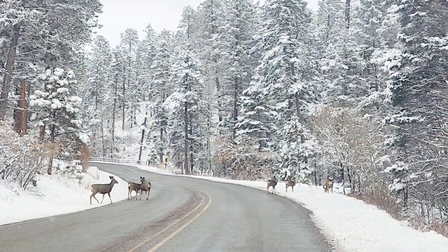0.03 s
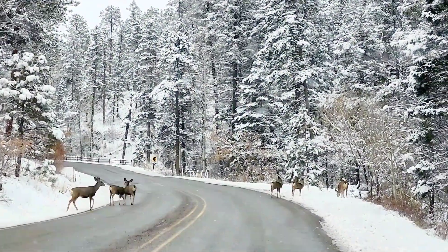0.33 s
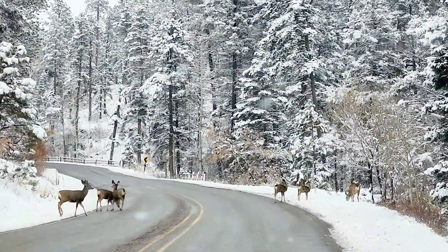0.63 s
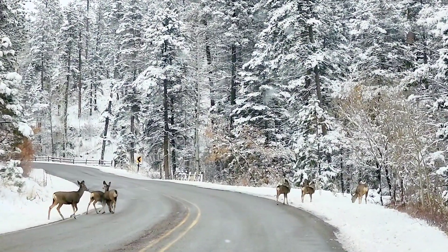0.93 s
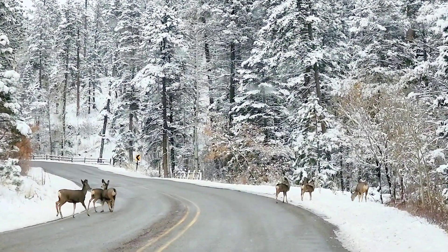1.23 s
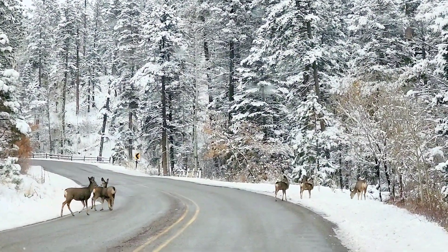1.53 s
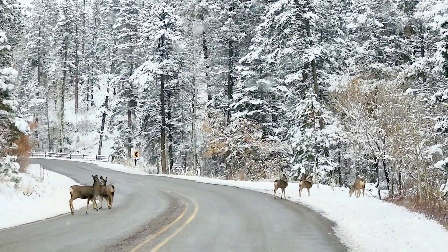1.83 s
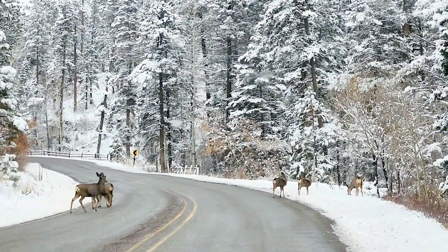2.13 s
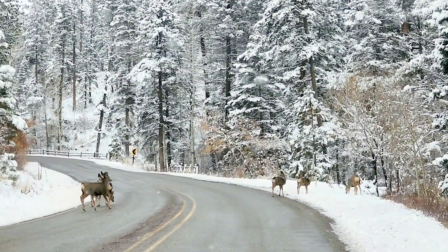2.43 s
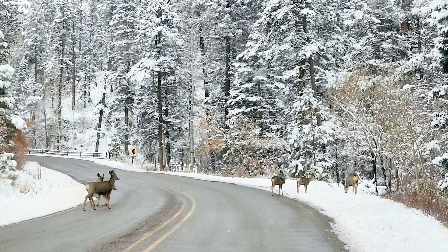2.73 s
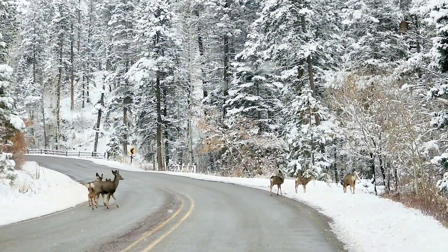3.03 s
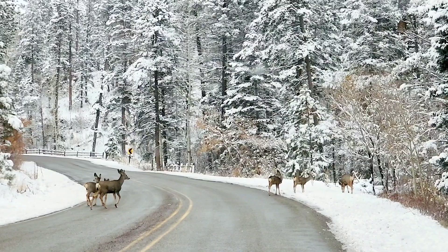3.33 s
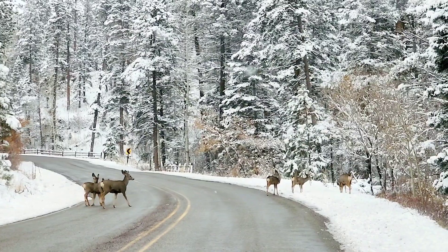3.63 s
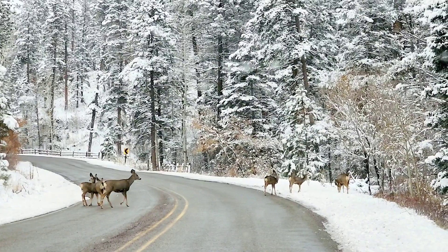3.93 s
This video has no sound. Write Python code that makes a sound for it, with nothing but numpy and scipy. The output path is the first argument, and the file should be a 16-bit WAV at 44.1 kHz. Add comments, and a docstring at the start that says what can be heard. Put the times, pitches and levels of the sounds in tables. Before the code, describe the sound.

Hazard lights click steadily inside a stopped car, a bright tick alternating with a duller tock over the idling engine's low rumble. The trim gives two tiny clicks, and something rubs faintly at the end.

```python
"""A hazard relay goes tick, tock inside a stopped car, over the low rumble of the idling engine.
The armature closes with a bright tick and drops back with a duller tock; the contacts bounce,
both strokes ring the same small housing, and the padded cabin adds a short, faint tail.
Two stray little clicks come from the trim, and at the end something rubs softly over it."""
import sys
import numpy as np
from scipy import signal
from scipy.fft import rfft, irfft
from scipy.io import wavfile
from scipy.ndimage import uniform_filter1d

SR = 44100
rng = np.random.default_rng(int(sys.argv[2]) if len(sys.argv) > 2 else 0)


def unload_audio(sound):
    """Save the sound as a 16-bit wav file, at the path given as the first command line argument."""
    columns = np.transpose(np.atleast_2d(sound))
    # keep every value between -1 and 1, then stretch to whole-number steps
    steps = np.round(np.clip(columns, -1, 1) * 32767)
    wavfile.write(sys.argv[1], SR, steps.astype(np.int16))


N = 176400  # 4 s


def amp(db):
    """Decibels to gain."""
    return 10 ** (np.asarray(db) / 20)


def unit_rms(x):
    """Scales to rms 1."""
    return x / np.sqrt(np.mean(x ** 2) + 1e-20)


def unit_blow(x, nominal_s=.02):
    """Scales a blow to the energy of rms 1 held for nominal_s."""
    return x / np.sqrt((x ** 2).mean(0).sum() / (nominal_s * SR))


def at_hz(table, hz):
    """Interpolates a table on a log-frequency axis."""
    table_hz, value = np.transpose(table)
    return np.interp(np.log(hz + 1), np.log(table_hz + 1), value)


def envelope(table, t):
    """Gain over time, interpolated in dB."""
    return amp(np.interp(t, *np.transpose(table)))


def pan(db):
    """Stereo gains for a left-minus-right level."""
    return amp(np.array([db, -db]) / 2)


def add(mix, start_s, sound):
    """Mixes a stereo sound in at start_s."""
    part = mix[:, max(round(start_s * SR), 0):][:, :sound.shape[1]]
    part += sound[:, :part.shape[1]]


def coloured(x, colour_db, pan_db=0, size=4096):
    """Minimum-phase filter with the given spectrum and balance."""
    hz = np.fft.rfftfreq(size, 1 / SR)
    log_gain = np.log(amp(at_hz(colour_db, hz)) * pan(pan_db + 0 * hz))
    mirrored = np.concatenate([log_gain, log_gain[:, -2:0:-1]], axis=1)
    taps = np.fft.ifft(np.exp(np.conj(signal.hilbert(mirrored)))).real
    return signal.fftconvolve(x, taps[:, :size // 2], axes=1)[:, :x.shape[1]]


def dense_ring(t60_s, rise_s, count=8192):
    """Dense ring of a struck part: stereo noise with a decay time per band and a flattened spectrum."""
    hz, frame_s, bands = signal.stft(rng.standard_normal((2, count)), SR, nperseg=128)
    decay = amp(-60 * frame_s / at_hz(t60_s, hz)[:, None])
    ring = signal.istft(bands * decay, SR, nperseg=128)[1][:, :count]
    attack = np.minimum(np.arange(count) / SR / rise_s, 1)
    spectrum = rfft(ring * attack, 2 * count)
    power = uniform_filter1d(abs(spectrum) ** 2, size=150, axis=1)
    return irfft(spectrum / np.sqrt(power + 1e-12))[:, :count]


# rumble and air spectrum (frequency [Hz], relative density [dB])
IDLE_COLOUR_DB = [(12, -33), (24, -15), (34, -2.5), (46, -2.5), (62, -13.5), (76, -9.5), (92, -11.5),
                  (115, -11), (138, -19.5), (165, -18), (212, -24), (285, -24), (325, -27.5), (362, -34),
                  (440, -32.5), (520, -43), (595, -37.5), (720, -48.5), (810, -42.5), (880, -47.5),
                  (1020, -43), (1120, -49), (1255, -40), (1305, -47.5), (1355, -37), (1430, -47.5),
                  (1700, -57.5), (2600, -68.5), (4500, -79), (7500, -83), (10500, -87), (13000, -83.5),
                  (16000, -85)]
# stereo likeness (frequency [Hz], left-right correlation [-])
IDLE_CORRELATION = [(35, .985), (70, .985), (110, .96), (200, .93), (320, .65), (450, .55), (650, .1),
                    (1300, -.15), (3100, .18), (15000, .24)]
# balance (frequency [Hz], left minus right [dB])
IDLE_PAN_DB = [(35, 1.5), (90, 0.2), (180, -1.5), (350, -1), (1300, 1), (4000, 0)]
# bass swell (time [s], level [dB])
IDLE_SWELL_DB = [(0, -43), (.08, -30), (.17, -41.5), (.45, -37), (.69, -28), (.8, -37.5), (1.13, -31.5),
                 (1.35, -34), (1.75, -35.5), (2.08, -39), (2.24, -32.5), (2.46, -33.5), (2.55, -28.5),
                 (2.72, -36.5), (2.9, -32.5), (3.55, -41), (3.7, -37.5), (4, -40.5)]


def idle_rumble(swell_below_hz=115, air_db=-33.5):
    """The body shell rumbles, nearly mono and swelling slowly, under a steady, diffuse rush of air."""
    hz, t = np.fft.rfftfreq(N, 1 / SR), np.arange(N) / SR
    noise = rfft(rng.standard_normal((2, N)))
    mid, side = (z / np.sqrt(uniform_filter1d(abs(z) ** 2, size=40)) for z in noise)
    correlation = np.clip(at_hz(IDLE_CORRELATION, hz), -1, 1)
    mid, side = mid * np.sqrt(1 + correlation), side * np.sqrt(1 - correlation)
    spectrum = np.array([mid + side, mid - side])
    spectrum *= amp(at_hz(IDLE_COLOUR_DB, hz)) * pan(at_hz(IDLE_PAN_DB, hz))
    spectrum /= irfft(spectrum, N).std()
    bass_share = 1 / (1 + (hz / swell_below_hz) ** 2)
    bass = irfft(spectrum * bass_share, N)
    air = irfft(spectrum * (1 - bass_share), N)
    return bass * envelope(IDLE_SWELL_DB, t) + amp(air_db) * air


def drift(t):
    """Slow random wander, rms 1: sines from 0.5 to 8 Hz."""
    rates_hz = np.geomspace(.5, 8, num=20)
    return unit_rms(sum(np.sin(2 * np.pi * (hz * t + rng.random())) for hz in rates_hz))


def firing_boom(firing_hz=34.9, wander_hz=2.73, swing_db=3.5, re_rumble_db=-4.5):
    """The engine's firing note, unsteady in pitch and strength, swelling with the rumble."""
    t = np.arange(N) / SR
    pitch_hz = firing_hz + wander_hz * drift(t)
    strength = amp(swing_db * np.tanh(drift(t)))
    note = np.sin(2 * np.pi * np.cumsum(pitch_hz) / SR) * strength
    level = amp(re_rumble_db) * envelope(IDLE_SWELL_DB, t)
    return pan(at_hz(IDLE_PAN_DB, firing_hz))[:, None] * unit_rms(note) * level


# tail decay (frequency [Hz], t60 [s])
CABIN_T60_S = [(500, .3), (2500, .32), (7000, .34), (15000, .38)]
# tail spectrum (frequency [Hz], relative density [dB])
CABIN_COLOUR_DB = [(400, 3), (2300, 6), (3200, 2), (4200, -3), (6000, 0), (9200, -1), (10800, -8),
                   (12500, -3), (16000, -5)]


def cabin_tail(strokes, level_db=-65):
    """The padded cabin leaves a faint diffuse tail after each relay stroke."""
    out = np.zeros((2, N))
    for time_s, *_ in strokes:
        tail = dense_ring(CABIN_T60_S, rise_s=.006, count=17640)
        add(out, time_s, unit_blow(coloured(tail, CABIN_COLOUR_DB)))
    return amp(level_db) * out


# rub envelope (time [s], level [dB])
RUB_LEVEL_DB = [(3.735, -85), (3.77, -75), (3.81, -70), (3.86, -68), (3.91, -72.5), (3.96, -68), (4, -83)]
# friction spectrum (frequency [Hz], relative density [dB])
RUB_COLOUR_DB = [(1000, -6), (2100, 5.5), (3150, -2.5), (3900, -8), (4700, -7), (5400, -7), (7300, -9),
                 (9300, -9), (10800, -17), (12500, -13), (14500, -12), (16000, -14)]
# rubbed resonances (frequency [Hz], width [Hz], level re hiss [dB])
RUB_RESONANCES = [(2800, 60, -14), (3170, 40, -16), (4220, 35, -16), (5402, 70, -12), (6130, 120, -15),
                  (7140, 110, -17)]


def trim_rub(grain_db=.5, pan_db=4):
    """Something slides softly over the trim: uneven friction hisses and wakes faint resonances."""
    t, hz = np.arange(N) / SR, np.fft.rfftfreq(N, 1 / SR)
    grain = amp(grain_db * unit_rms(uniform_filter1d(rng.standard_normal(N), size=200)))
    friction = rng.standard_normal((2, N)) * grain
    ring = sum(amp(db) * unit_rms(irfft(rfft(friction) / (1 + 2j * (hz - mode_hz) / width_hz), N))
               for mode_hz, width_hz, db in RUB_RESONANCES)
    hiss = unit_rms(coloured(friction, RUB_COLOUR_DB))
    level = envelope(RUB_LEVEL_DB, t) * (t > RUB_LEVEL_DB[0][0])
    return pan(pan_db)[:, None] * unit_rms(hiss + ring) * level


# snap ring decay (frequency [Hz], t60 [s])
SNAP_T60_S = [(1000, .05), (3000, .03), (3900, .05), (4300, .17), (4800, .17), (5600, .04), (7500, .035),
              (14000, .05)]
# snap spectrum (frequency [Hz], relative density [dB])
SNAP_COLOUR_DB = [(300, 3), (1200, 3), (1700, -5), (2500, -3), (3100, -8), (4200, -4.5), (5600, -.5),
                  (8200, -12), (10000, -10), (13000, -2), (16000, -6)]
# knock spectrum (frequency [Hz], relative density [dB])
KNOCK_COLOUR_DB = [(500, -24), (1400, 4), (1650, -6), (1950, 9), (2400, -18), (5000, -40), (16000, -45)]


def trim_clicks(snap_s=.1544, snap_db=-49, crack_decay_s=.0008, ring_db=-14, knock_s=2.655, knock_db=-62):
    """The trim gives a tiny dry snap with a faint ring, and later a soft knock."""
    out = np.zeros((2, N))
    crack = dense_ring([(1000, .004)], rise_s=.0001)
    crack *= np.exp(-np.arange(crack.shape[1]) / SR / crack_decay_s)
    ring = dense_ring(SNAP_T60_S, rise_s=.0026)
    snap = coloured(unit_rms(crack) + amp(ring_db) * unit_rms(ring), SNAP_COLOUR_DB, pan_db=-2.5)
    add(out, snap_s, amp(snap_db) * unit_blow(snap))
    knock = coloured(dense_ring([(1000, .083)], rise_s=.0017), KNOCK_COLOUR_DB, pan_db=-1)
    add(out, knock_s, amp(knock_db) * unit_blow(knock))
    return out


def contact_bounce(t, delay_s=.0017, scatter_s=.0003, decay_s=.0009):
    """The contacts land again just after first touch, with a short crack."""
    since_s = t - delay_s - scatter_s * rng.standard_normal()
    return rng.standard_normal((2, len(t))) * (since_s > 0) * np.exp(-abs(since_s) / decay_s)


# housing modes (frequency [Hz], tick level [dB], tock level [dB], t60 [s])
HOUSING_MODES = [(1265, -15, -7, .1), (1352, -16, -7, .11), (1840, -25, -10, .06), (2085, -11, -14, .16),
                 (2135, -16, -21, .12), (2335, -3, -2, .062), (2420, -12, -3, .06), (2810, -10, -11, .06),
                 (2950, -19, -6, .06), (3020, -13, -8, .07), (3620, -18, -18, .05), (4350, -19, -25, .04),
                 (4730, -27, -20, .06), (5550, -6, -11, .036), (6020, -13, -3, .04), (6130, -12, -1, .045),
                 (6450, -7, -10, .036), (6720, -11, -4, .038), (7230, 0, -3, .04), (7390, 0, -15, .04),
                 (7530, -2, -13, .038), (7760, -6, -17, .036), (8120, -4, -13, .038), (8310, -2, -11, .04),
                 (8550, -7, -14, .038), (9330, -4, -14, .034), (11450, 0, -20, .03)]
# relay balance (frequency [Hz], left minus right [dB])
RELAY_PAN_DB = [(1300, 4), (2500, -5.5), (3300, 7.5), (5500, -2.5), (6500, -3.5), (8400, -1), (11500, -1.5),
                (15000, 4)]


def housing_ring(t, closing, rise_s, phases, scatter_db=2.5):
    """The relay housing's modes, each struck a little harder or softer on every stroke."""
    ring = np.zeros((2, len(t)))
    for (hz, tick_db, tock_db, t60_s), phase in zip(HOUSING_MODES, phases):
        level_db = (tick_db if closing else tock_db) + scatter_db * rng.standard_normal()
        mode = amp(level_db - 60 * t / t60_s) * np.sin(2 * np.pi * (hz * t + phase))
        ring += pan(at_hz(RELAY_PAN_DB, hz))[:, None] * mode
    return ring * np.minimum(t / rise_s, 1)


# dashboard ring decay (frequency [Hz], t60 [s])
DASH_T60_S = [(500, .1), (1400, .085), (2200, .056), (3000, .066), (4500, .054), (7000, .05), (14000, .049)]


def armature(strokes, colour_db, closing, housing_db, bounce_db, rise_s, lead_s,
             dash_db=-.5, variation=.4):
    """Near-identical blows ring dashboard and housing, each building up as the contacts settle."""
    out = np.zeros((2, N))
    shared_ring = dense_ring(DASH_T60_S, rise_s)
    t = np.arange(shared_ring.shape[1]) / SR
    pan_db = at_hz(RELAY_PAN_DB, np.fft.rfftfreq(4096, 1 / SR))
    phases = rng.random((len(HOUSING_MODES), 1, 1))
    phases = phases + rng.random((len(HOUSING_MODES), 2, 1)) / 2  # up to half a cycle per channel
    for time_s, level_db, treble_db in strokes:
        strike = unit_rms(shared_ring + variation * dense_ring(DASH_T60_S, rise_s))
        strike += amp(bounce_db) * unit_rms(contact_bounce(t))
        dash = amp(dash_db) * unit_blow(coloured(strike, colour_db, pan_db))
        housing = amp(housing_db) * housing_ring(t, closing, rise_s, phases)
        blow = coloured(dash + housing, [(4000, 0), (12000, treble_db)])  # treble shelf
        add(out, time_s - lead_s, amp(level_db) * blow)  # first touch comes early
    return out


# relay closes (time [s], relative level [dB], treble shelf [dB])
TICK_STROKES = [(0.3077, -45, 2.5), (0.992, -43.5, 1), (1.6757, -44, .5), (2.3603, -45, -0.5),
                (3.0442, -43.5, -2.5), (3.7294, -45, -1)]
# relay opens (time [s], relative level [dB], treble shelf [dB])
TOCK_STROKES = [(0.6501, -41.5, -1), (1.3351, -43, -0.5), (2.0197, -43.5, -0.5), (2.7035, -43, -1.5),
                (3.3884, -43.5, 1)]
# closing blow spectrum (frequency [Hz], relative density [dB])
TICK_COLOUR_DB = [(200, -24), (450, -8), (800, -20), (1300, -3), (1650, -15), (2350, -2.5), (2650, -15),
                  (2950, -8), (3300, -16.5), (4000, -29), (4400, -26), (5050, -30), (5600, -19),
                  (6000, -17.5), (6800, -10), (7300, -10.5), (7800, -14), (8400, -5), (10000, -18.5),
                  (10800, -10.5), (11500, -2), (13000, -9.5), (15600, -11)]
# opening blow spectrum (frequency [Hz], relative density [dB])
TOCK_COLOUR_DB = [(200, -34.5), (450, -3), (800, -7.5), (1300, -1.5), (1650, -6), (2350, -4.5),
                  (2600, -11.5), (2950, -16.5), (3300, -19), (4000, -30), (5100, -27.5), (5600, -15.5),
                  (6050, -9.5), (6400, -17.5), (6900, -21), (7250, -10), (7700, -22), (8400, -18),
                  (10000, -28), (11500, -18), (13000, -23.5), (15600, -24.5)]


def hazard_relay(gain_db=-1.5):
    """The armature closes with a bright tick and drops back with a duller tock."""
    ticks = armature(TICK_STROKES, TICK_COLOUR_DB, closing=True,
                     housing_db=1, bounce_db=-7.5, rise_s=.0018, lead_s=.00022)
    tocks = armature(TOCK_STROKES, TOCK_COLOUR_DB, closing=False,
                     housing_db=.5, bounce_db=-11.5, rise_s=.0026, lead_s=.0011)
    return amp(gain_db) * (ticks + tocks)


def scene():
    """Relay, trim clicks and a soft rub in the cabin, over the idle."""
    clicks = hazard_relay() + trim_clicks() + cabin_tail(TICK_STROKES + TOCK_STROKES)
    return clicks + idle_rumble() + firing_boom() + trim_rub()


def record(dry):
    """Low-pass at 16 kHz."""
    taps = signal.firwin(255, 16000, window=("kaiser", 8), fs=SR)
    return signal.oaconvolve(dry, taps[None], "same")


dry = scene()
out = record(dry)
unload_audio(out)
```